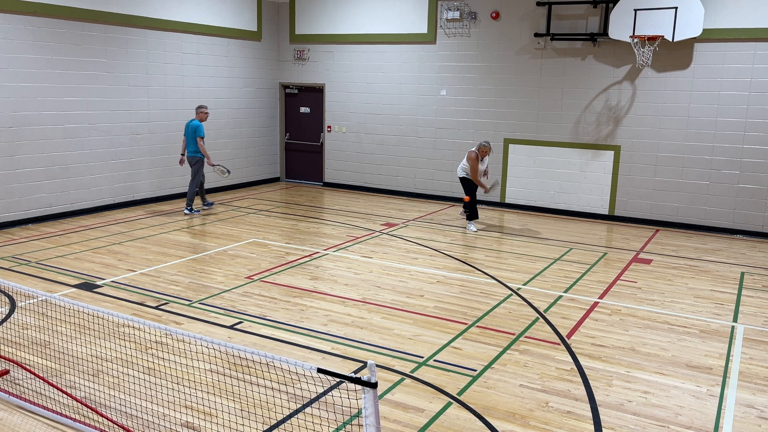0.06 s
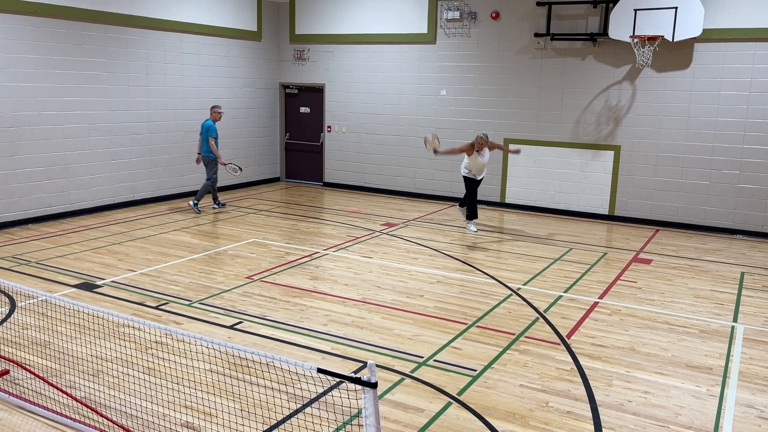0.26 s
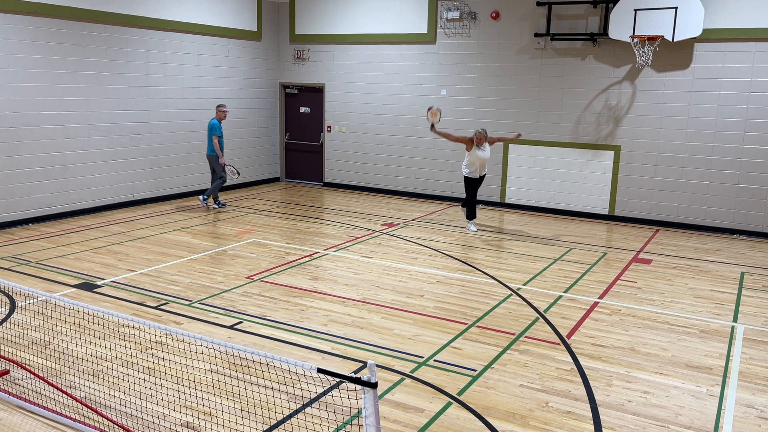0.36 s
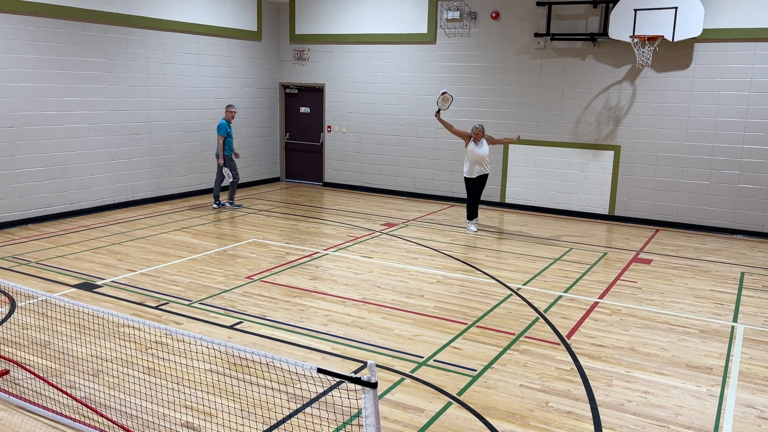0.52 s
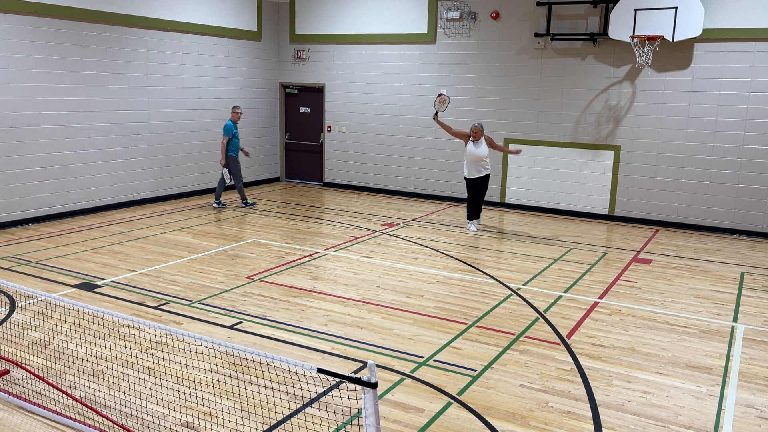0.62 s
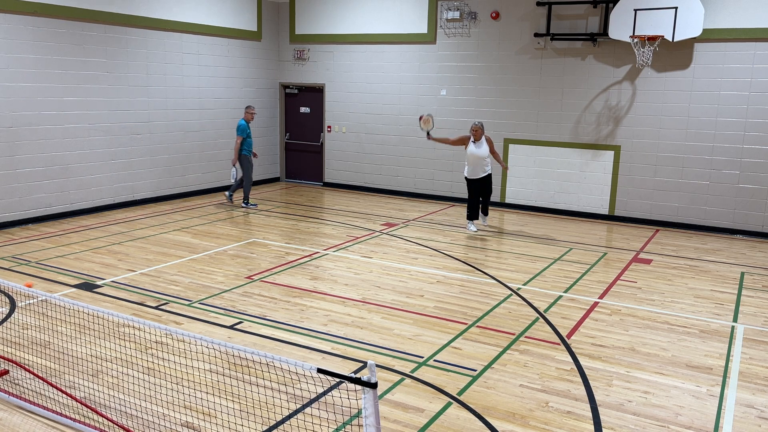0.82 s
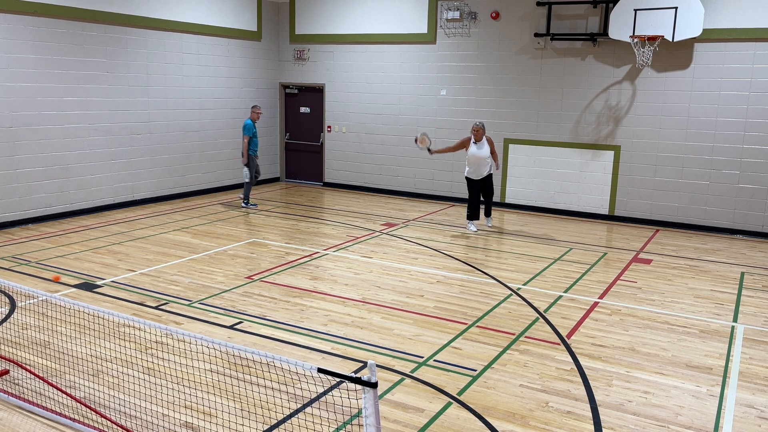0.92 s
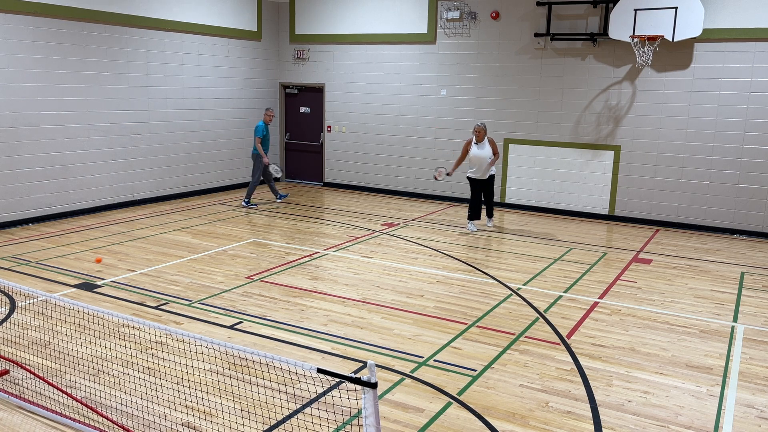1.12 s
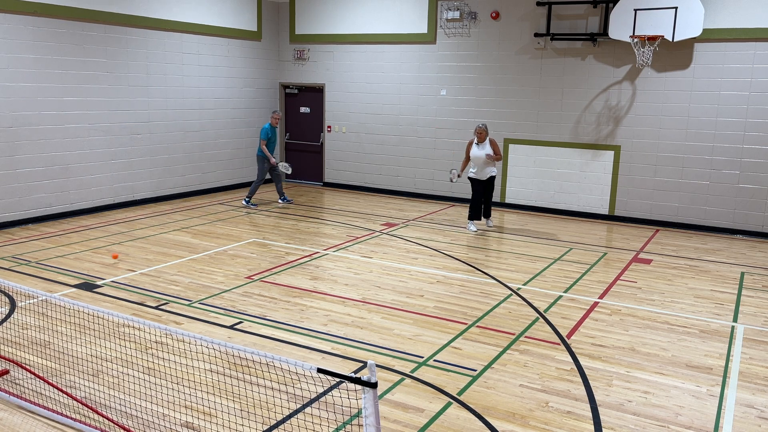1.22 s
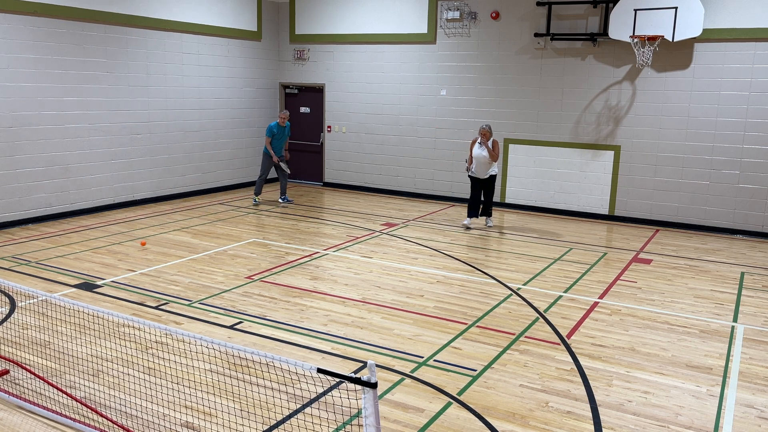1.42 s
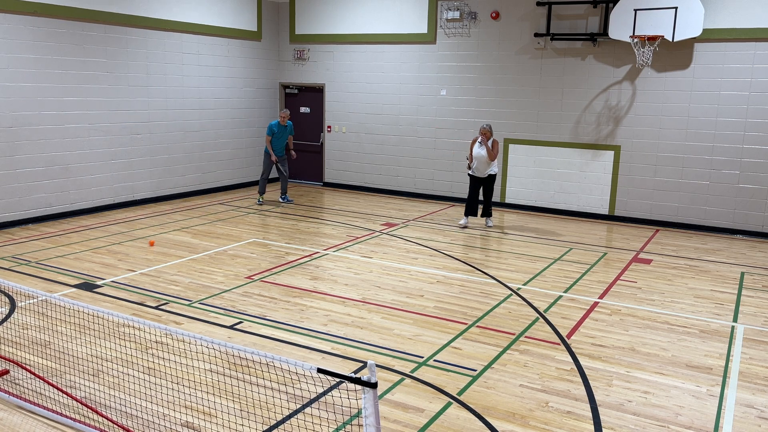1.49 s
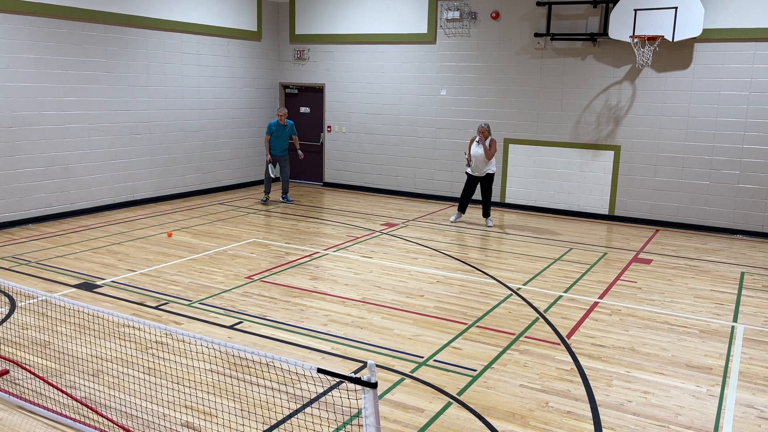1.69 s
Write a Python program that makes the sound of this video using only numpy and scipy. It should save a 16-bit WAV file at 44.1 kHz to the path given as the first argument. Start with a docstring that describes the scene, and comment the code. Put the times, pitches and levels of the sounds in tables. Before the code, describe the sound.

One sharp paddle hit on a plastic ball slightly overloads the microphone and echoes through a big gym. Farther away the ball bounces once, softly, and a few quiet footsteps land on the wooden floor under faint ventilation rumble.

```python
"""Paddle stroke in a large gym

Over the hum of ventilation, a paddle strikes a hollow plastic ball: a pock near 1 kHz, close enough to
overload the microphone. The walls throw it back and the hall swells and rings for over a second.
Farther off the ball bounces once, more softly, and a player steps on the wooden floor.
A noise suppressor behind the microphone shuts down the end of the tail."""
import sys
import numpy as np
from scipy import signal
from scipy.fft import irfft
from scipy.io import wavfile
from scipy.ndimage import uniform_filter1d

SR = 44100
rng = np.random.default_rng(int(sys.argv[2]) if len(sys.argv) > 2 else 0)


def master(y):
    """Save y as 16-bit WAV."""
    cut = np.clip(np.atleast_2d(y).T, -1, 1)
    pcm = np.round(cut * 32767)  # scale
    wavfile.write(sys.argv[1], SR, pcm.astype(np.int16))


N = 77175
T = np.arange(N) / SR

# room tone of the ventilation (frequency [Hz], relative density [dB])
VENT_SPECTRUM = [(20, 2), (45, -6), (75, -14.5), (130, -30), (250, -25), (500, -19.5), (1000, -31.5),
                 (1600, -38.5), (3000, -52), (6000, -61.5), (15000, -68)]
# footfalls (time [s], floor level [dB], sole level [dB])
FOOTFALLS = [(.012, -45, -60), (0.777, -50.5, -41), (1.109, -52.5, -50), (1.288, -37, -52)]
# the sprung floor under a shoe (frequency [Hz], relative density [dB], t60 [s])
FLOOR_BANDS = [(25, 8.5, .35), (60, 3.5, 0.44), (100, -8, .35), (170, -26.5, .3), (600, -39.5, .3),
               (2000, -67, .3), (8000, -78.5, .3)]
# the sole landing on the boards (frequency [Hz], relative density [dB], t60 [s])
SOLE_BANDS = [(80, -16, .3), (150, -6, 0.1), (272, 3.5, .35), (464, 1, .35), (1000, -25, .4),
              (2400, -26.5, .4), (4500, -44.5, .3), (15000, -56, .3)]
# partials of the overloaded pock: a ring near 1 kHz with bright distortion overtones
# (frequency [Hz], relative level [dB], t60 [s])
POCK_PARTIALS = [(978, 0, .039), (1150, -12, .025), (550, -17, .04), (2200, -18, .026), (2590, -19, .026),
                 (2945, -18, .026), (3520, -20, .024), (3740, -19, .024), (4590, -17, .022),
                 (5900, -21, .018), (6500, -23, .018), (8650, -27, .018)]
# the crack of contact (frequency [Hz], relative density [dB])
CRACK_SPECTRUM = [(150, -19.5), (300, -11), (1500, 5), (2600, 4), (4000, -6), (6500, -2.5), (9000, -12.5),
                  (13000, -15.5), (15500, -22.5)]
# first reflections at the microphone (delay [s], pock gain [dB], crack gain [dB])
FIRST_REFLECTIONS = [(.01225, -7.5, -18), (.01480, -10.5, -25), (.0243, -28, -14), (.0308, -29, -19),
                     (.0405, -28, -23), (.047, -23, -29)]
# dull thump off the floor and the wall behind (frequency [Hz], relative density [dB], t60 [s])
THUMP_BANDS = [(90, -30, .15), (160, -14, .15), (240, 3, 0.053), (380, 8.5, .17), (600, -2.5, 0.11),
               (800, -22.5, .1), (3000, -52, .1)]
# scatter from the near walls (frequency [Hz], relative density [dB], t60 [s])
NEAR_WALL_BANDS = [(100, -40, .5), (220, -23.5, 0.24), (400, -6, .5), (605, 6.5, .6), (695, -11.5, .6),
                   (980, 14.5, .6), (1600, -12.5, 0.94), (3000, -19.5, .45), (6300, -23, .4),
                   (8500, -26, .36), (9600, -35.5, .36), (15000, -37.5, .3)]
# reverberation of the whole hall (frequency [Hz], relative density [dB], t60 [s])
HALL_BANDS = [(111, -41, 1.6), (225.7, -26.5, 1.34), (376, -16, 1.48), (496, -14, 1.58), (605, -6.5, 2.347),
              (706, -15.5, 2.04), (739, -27.5, 1.5), (865, -7, 2.32), (983, 2.5, 2.33), (1140, -5.5, 2.47),
              (1339, -12, 2.47), (1647, -26.5, 2.02), (2770, -36, 2.22), (4180, -40, 1.66),
              (7500, -53, 1.05), (9900, -66.5, 0.47), (15000, -71, .9)]
# boomy return from the far end (frequency [Hz], relative density [dB], t60 [s])
FAR_END_BANDS = [(116, -31, .15), (189, 6, 0.051), (317, 4.5, 0.2), (450, -4.5, .2), (642, 9, 0.2),
                 (766, 3.5, .25), (895, 11, 0.1), (1540, -9.5, 0.083), (4000, -54.5, 0.11)]
# the bounce, heard through the hall (frequency [Hz], relative density [dB], t60 [s])
BOUNCE_BANDS = [(101, 2, 1.3), (220, -2.5, 0.43), (400, 12, 0.84), (740, 3.5, 1.1), (1320, 16, 1.72),
                (1760, 1, 1.3), (2840, -8, 1.78), (4440, -12, 1.05), (6360, -20, 0.69), (7100, -26.5, 0.43),
                (8100, -20.5, 0.41), (10450, -38, .5), (15000, -47, .4)]
# threshold under which the suppressor closes (frequency [Hz], density [dB/Hz])
SUPPRESSOR_THRESHOLD = [(110, -100), (260, -71), (600, -68.5), (1050, -64), (1400, -73), (1800, -88.5),
                        (3000, -94.5), (6000, -110), (15000, -120)]


def amp(db):
    """Decibels to gain."""
    return 10 ** (np.asarray(db) / 20)


def read(points, hz, column=1):
    """One column of a table, interpolated on a log-frequency scale."""
    table = np.array(points, float)
    return np.interp(np.log(hz + 1), np.log(table[:, 0] + 1), table[:, column])


def delayed(x, delay_s):
    """The sound, starting delay_s later."""
    return np.concatenate([np.zeros(round(delay_s * SR)), x])[:N]


def dying(t60):
    """Exponential decay, 60 dB down after t60 seconds."""
    return np.exp(-np.log(1000) * T / t60)


def noise(spectrum):
    """Noise of unit power with the given spectral shape."""
    hz = np.fft.rfftfreq(N, 1 / SR)
    phases = np.exp(2j * np.pi * rng.random(len(hz)))
    x = irfft(amp(read(spectrum, hz)) * phases, N)
    return x / x.std()


def tail(bands, rise_s):
    """Dense reflections: they build up, then each band dies at its own speed."""
    frames = dict(fs=SR, nperseg=2048, noverlap=1536)
    hz, t, spectra = signal.stft(noise(bands), **frames)
    t60 = read(bands, hz, column=2)[:, None]
    decay = amp(-60 * np.maximum(t - rise_s, 0) / t60)
    return signal.istft(spectra * decay, **frames)[1][:N] * np.minimum(T / rise_s, 1)


def ventilation():
    """Room tone: moving air rumbles steadily through the gym."""
    return amp(-39) * noise(VENT_SPECTRUM)


def steps(rise_s=.025):
    """Off the microphone, soles land and the sprung wooden floor thuds under them."""
    track = np.zeros(N)
    for time_s, floor_db, sole_db in FOOTFALLS:
        floor = amp(floor_db) * tail(FLOOR_BANDS, rise_s)
        sole = amp(sole_db) * tail(SOLE_BANDS, rise_s)
        track += delayed(floor + sole, time_s)
    return track


def paddle(pock_rise_s=.0016, crack_rise_s=.002, echo_cut_hz=2340):
    """Close up, a crack of contact and an overloaded pock; floor and nearest walls send duller copies."""
    ring = sum(amp(db) * dying(t60) * np.sin(2 * np.pi * hz * T) for hz, db, t60 in POCK_PARTIALS)
    pock = amp(7.5) * ring * (1 - np.exp(-T / pock_rise_s))
    crack = amp(-4.5) * noise(CRACK_SPECTRUM) * dying(t60=.024) * (1 - np.exp(-T / crack_rise_s))
    dull_pock = signal.sosfiltfilt(signal.butter(2, echo_cut_hz, fs=SR, output="sos"), pock)
    echoes = sum(delayed(amp(pock_db) * dull_pock + amp(crack_db) * crack, delay_s)
                 for delay_s, pock_db, crack_db in FIRST_REFLECTIONS)
    return pock + crack + echoes


def hall():
    """The stroke scatters back to the microphone, later the farther away the surface stands."""
    thump = amp(-25.5) * tail(THUMP_BANDS, rise_s=.03)
    near_walls = amp(-17.5) * delayed(tail(NEAR_WALL_BANDS, rise_s=.016), delay_s=.014)
    far_end = amp(-21) * delayed(tail(FAR_END_BANDS, rise_s=.032), delay_s=.098)
    whole_room = amp(-13.5) * delayed(tail(HALL_BANDS, rise_s=.044), delay_s=.07)
    return thump + near_walls + far_end + whole_room


def bounce():
    """The ball lands at a distance; only its reverberation reaches the microphone."""
    return amp(-30) * tail(BOUNCE_BANDS, rise_s=.035)


def scene():
    """The gym as it sounds at one microphone position."""
    stroke = delayed(paddle() + hall(), delay_s=.2078)
    landing = delayed(bounce(), delay_s=.683)
    return (stroke + landing + steps() + ventilation())[None]


def overload(x, ceiling=.64, hardness=8, duck_db=7, full_duck_excess=.495, ahead_samples=130):
    """The input clips, and a limiter that looks a moment ahead ducks while the overload lasts."""
    clipped = x / (1 + abs(x / ceiling) ** hardness) ** (1 / hardness)
    excess = np.maximum(abs(x) - ceiling, 0)
    coming_excess = uniform_filter1d(excess, ahead_samples, origin=-(ahead_samples // 2))
    return clipped * amp(-duck_db * np.clip(coming_excess / full_duck_excess, 0, 1))


def suppress(x, depth_db=20, slope=1.9, smooth_s=.035):
    """The suppressor turns each band down the further its smoothed level sinks under the threshold."""
    frames = dict(fs=SR, nperseg=1024, scaling="psd")
    hz, t, spectra = signal.stft(x, boundary="even", **frames)
    band_power = uniform_filter1d(2 * abs(spectra) ** 2, size=9, axis=0)
    memory = np.exp(-t[1] / smooth_s)
    smooth_power = signal.lfilter([1 - memory], [1, -memory], band_power)
    under_db = read(SUPPRESSOR_THRESHOLD, hz)[:, None] - 10 * np.log10(abs(smooth_power) + 1e-20)
    cut_db = np.clip(slope * under_db, 0, depth_db)
    return signal.istft(spectra * amp(-cut_db), **frames)[1][:N]


def record(dry, low_cut_hz=100, high_cut_hz=15600):
    """The mono microphone chain: overload, low cut, noise suppressor and band limit."""
    low_cut = signal.butter(2, low_cut_hz, "high", fs=SR, output="sos")
    band_limit = signal.firwin(255, high_cut_hz, window=("kaiser", 9), fs=SR)
    x = overload(dry[0])
    x = signal.sosfilt(low_cut, x - x[0])  # starting from zero avoids a click
    return signal.oaconvolve(suppress(x), band_limit, "same")[None]


dry = scene()
out = record(dry)
master(out)
```